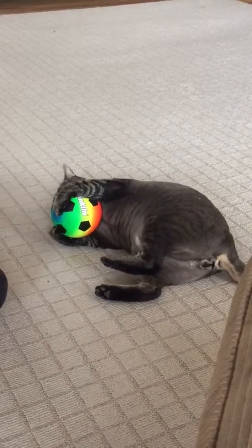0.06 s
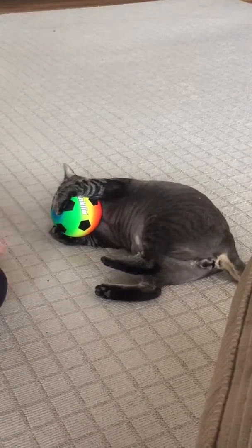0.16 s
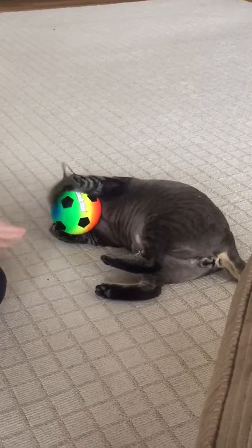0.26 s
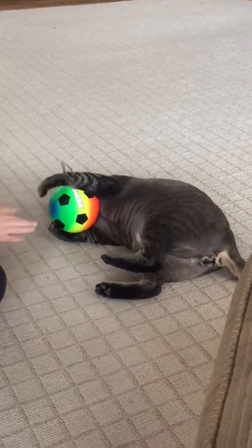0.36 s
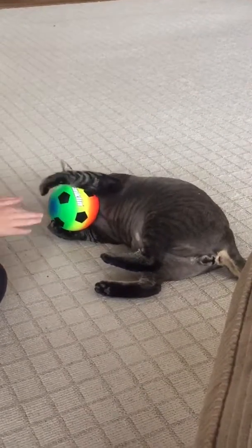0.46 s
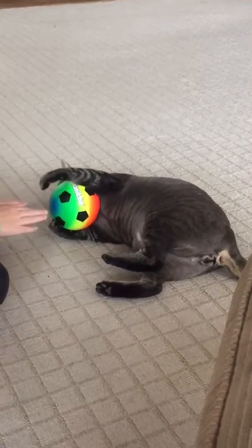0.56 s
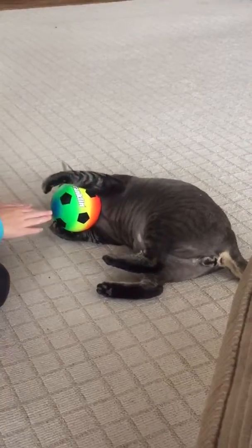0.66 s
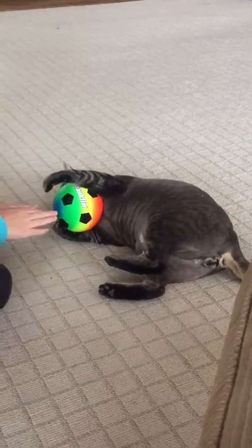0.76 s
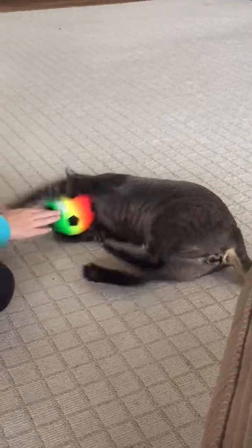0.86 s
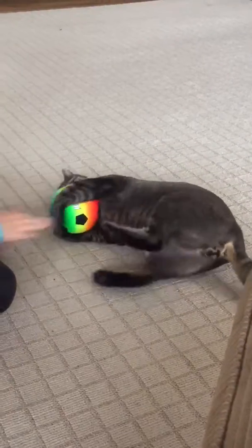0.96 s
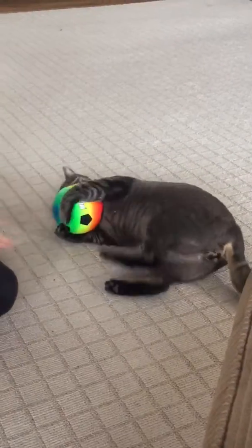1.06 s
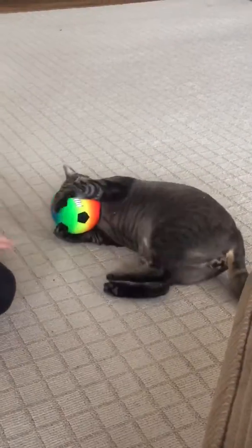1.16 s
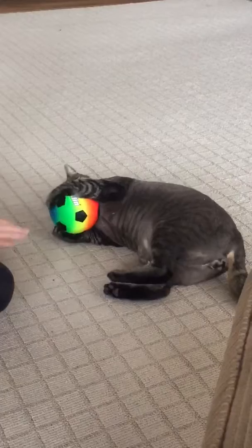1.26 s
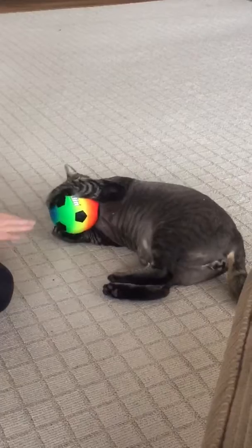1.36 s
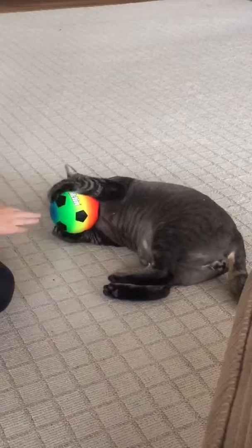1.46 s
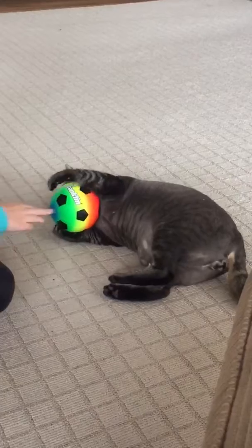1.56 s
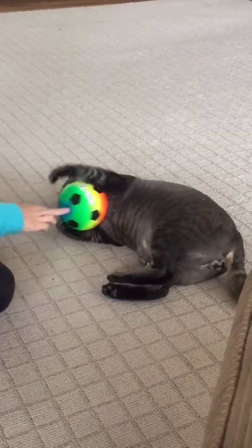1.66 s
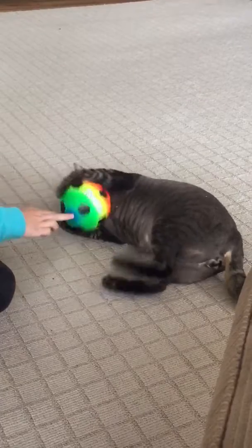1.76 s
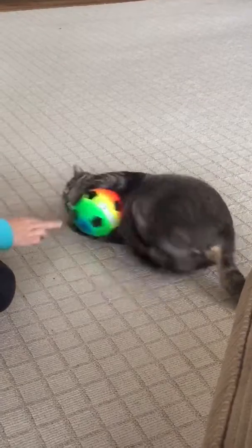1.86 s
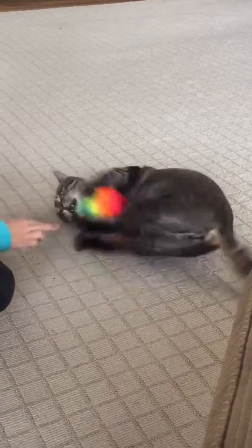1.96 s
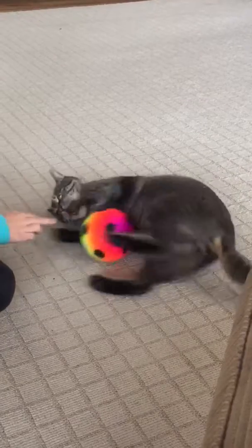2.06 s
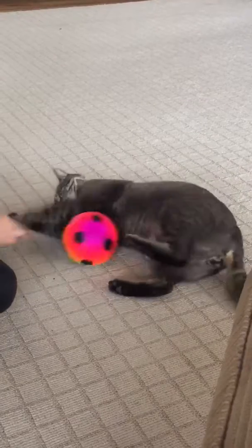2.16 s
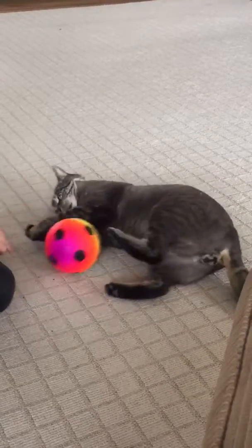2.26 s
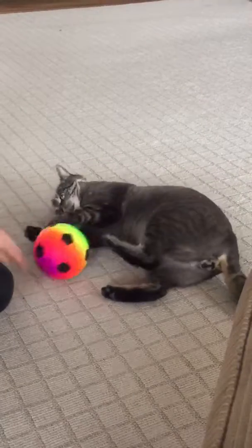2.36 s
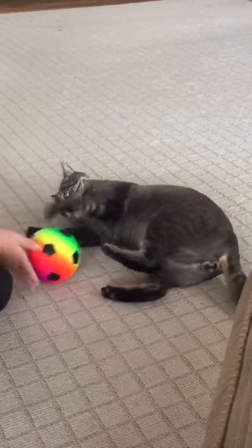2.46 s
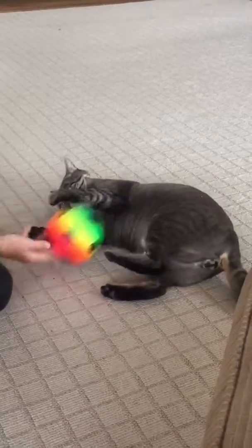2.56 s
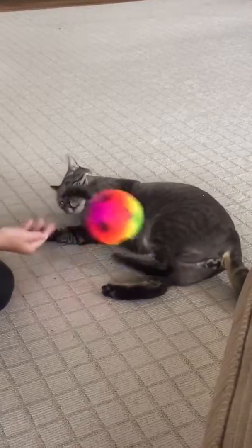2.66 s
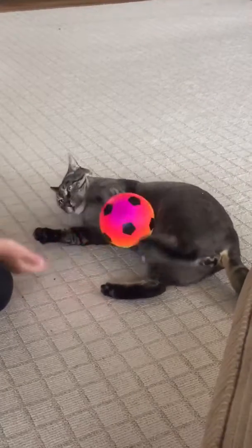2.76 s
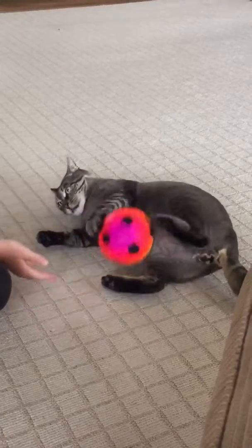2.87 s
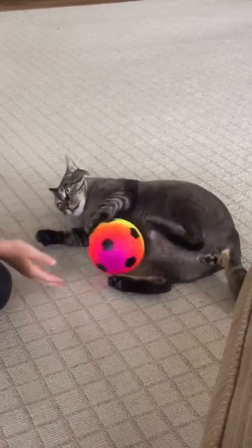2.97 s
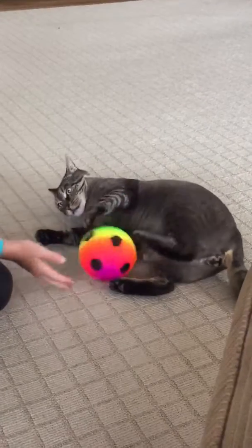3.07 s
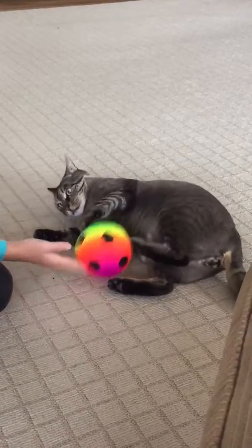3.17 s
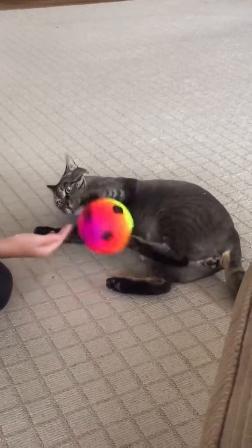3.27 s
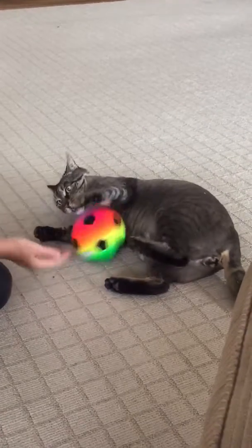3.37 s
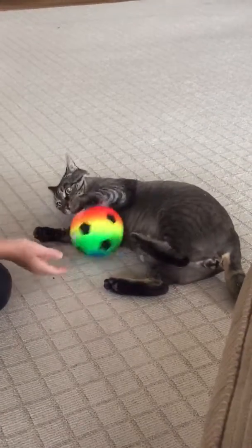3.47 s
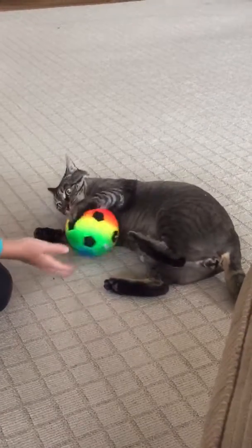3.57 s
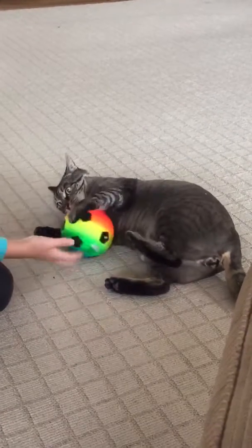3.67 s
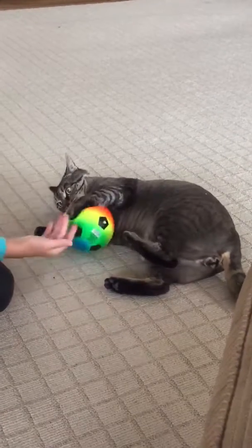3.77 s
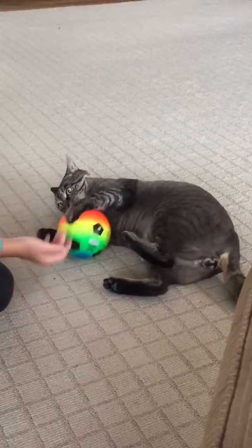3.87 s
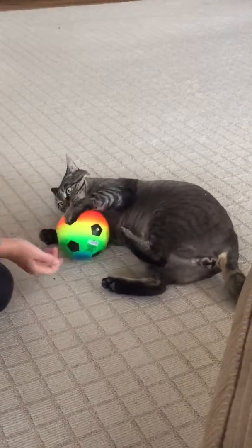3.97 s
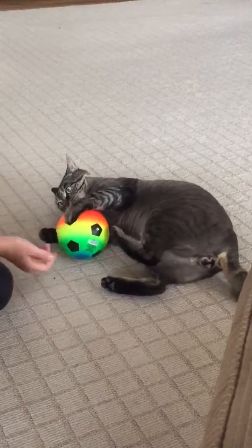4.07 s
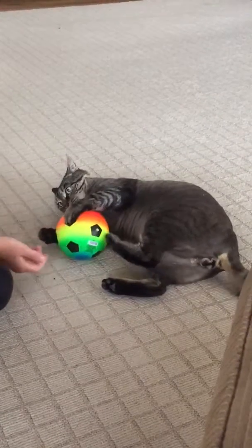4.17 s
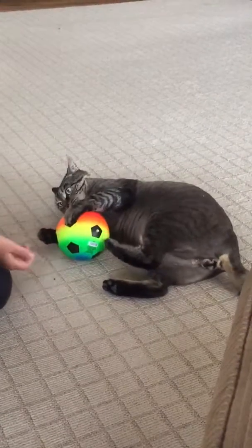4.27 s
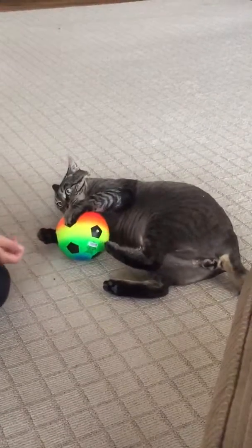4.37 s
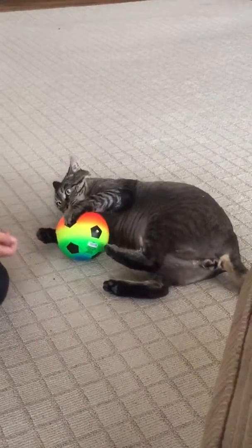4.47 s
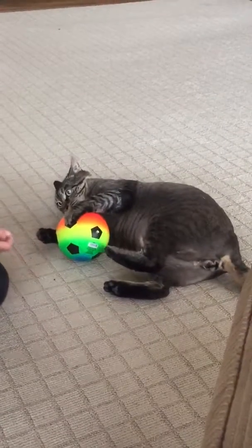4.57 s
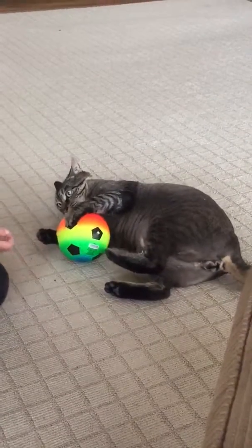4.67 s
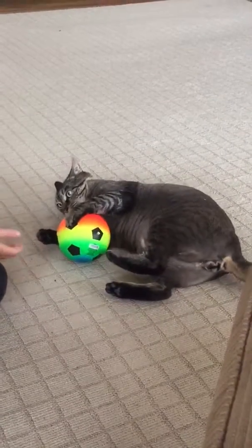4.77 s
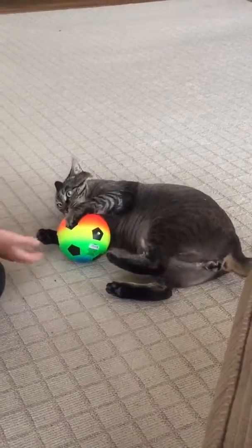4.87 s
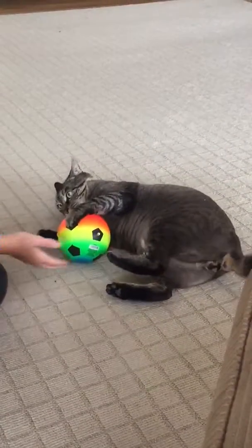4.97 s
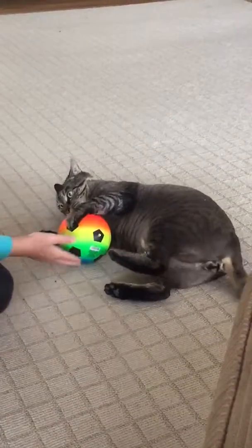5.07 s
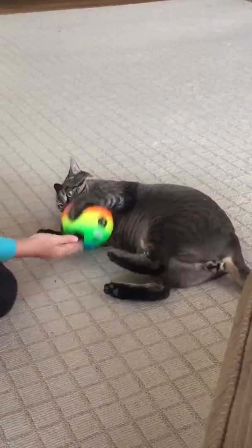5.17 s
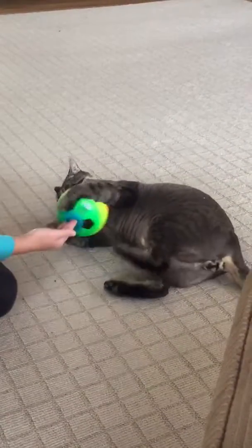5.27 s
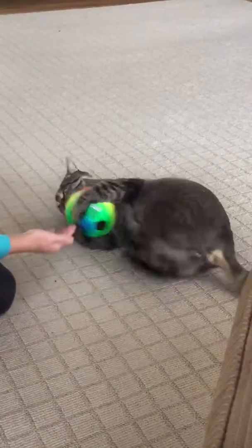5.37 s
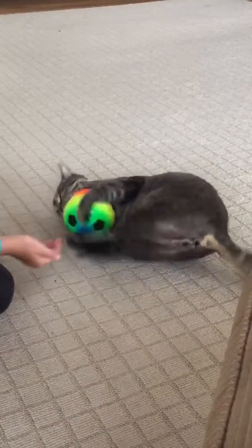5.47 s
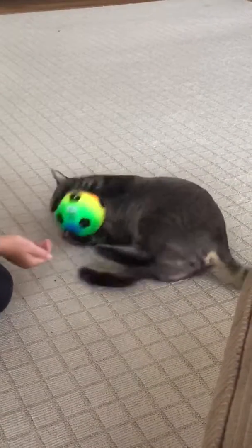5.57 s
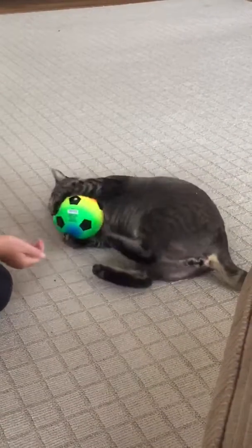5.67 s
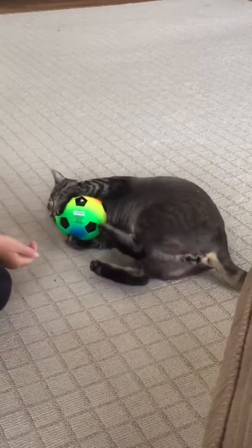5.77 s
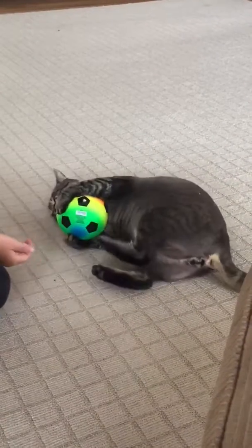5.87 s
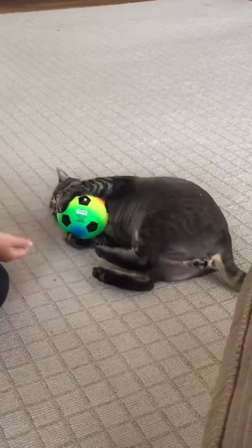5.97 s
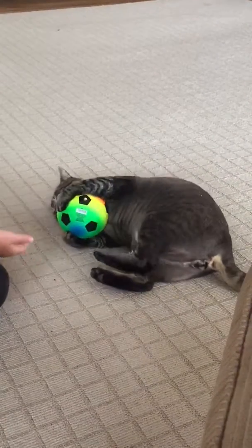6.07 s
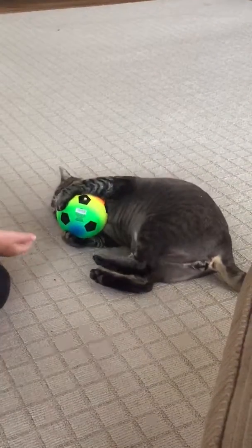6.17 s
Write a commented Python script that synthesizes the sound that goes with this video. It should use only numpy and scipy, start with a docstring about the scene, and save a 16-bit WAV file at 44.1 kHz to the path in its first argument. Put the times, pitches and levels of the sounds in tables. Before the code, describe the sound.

A cat lying on carpet starts with a quiet fluttering growl that tightens upward into a raspy snarl. A louder snarl follows with hiss, then rapid hollow paw thumps on a plastic ball. After a brief bark-like snarl it launches a long wavering yowl, falls silent, and ends with another snarl and thumps. Live living-room echo, soft rumble and faint hum; a microphone a short distance away.

```python
"""A cat hugging a soft plastic ball on a carpet warns off a hand: growl, short snarls, one long yowl.
Its voice is glottal pulses and turbulence through resonances that move with the jaw.
Thumps on the ball and a knock on the floor are decaying sines; fur, claws and air past the teeth
are shaped noise. A living room adds echoes, rumble, hum and hiss."""
import sys
import numpy as np
from scipy import signal
from scipy.fft import rfft, irfft, next_fast_len
from scipy.io import wavfile
from scipy.ndimage import uniform_filter1d

SR = 44100
rng = np.random.default_rng(int(sys.argv[2]) if len(sys.argv) > 2 else 0)


def dump(signal):
    """Clip the signal to [-1, 1] and save it as 16-bit WAV at the path in sys.argv[1]."""
    limited = np.clip(np.atleast_2d(signal).T, -1, 1)
    pcm = np.round(limited * 32767).astype(np.int16)
    wavfile.write(sys.argv[1], SR, pcm)


N = 274302
TIME = np.arange(N) / SR
FREQS = np.fft.rfftfreq(N, 1 / SR) + 1e-3   # offset keeps log(0) away


def from_db(db):
    """Decibels to amplitude gain."""
    return 10 ** (np.asarray(db) / 20)


def rms_one(x):
    """Scale to unit power."""
    return x / np.sqrt(np.mean(x ** 2) + 1e-20)


def in_time(rows):
    """Columns of a (time, ...) table, interpolated at every sample."""
    time_s, *columns = np.transpose(rows)
    return [np.interp(TIME, time_s, column) for column in columns]


def at_hz(points, hz):
    """Read a (frequency, value) table on a log-frequency axis."""
    table_hz, value = np.transpose(points)
    return np.interp(np.log(hz), np.log(table_hz), value)


def shaped(x, gain):
    """Zero-phase filter by a gain given at each of FREQS."""
    size = next_fast_len(N + SR // 2)
    size_gain = np.interp(np.fft.rfftfreq(size, 1 / SR), FREQS, gain)
    return irfft(rfft(x, size) * size_gain, size)[:N]


def band(x, edges_hz, order=4):
    """Butterworth band-pass."""
    sos = signal.butter(order, edges_hz, "band", fs=SR, output="sos")
    return signal.sosfilt(sos, x + 1e-18)


def noise(spectrum):
    """Steady noise of a given spectrum, unit power."""
    return rms_one(shaped(rng.standard_normal(N), from_db(at_hz(spectrum, FREQS))))


def drift(rate_hz):
    """Random curve through rate_hz knots a second, unit power."""
    knots = rng.standard_normal(8192)
    return rms_one(np.interp(TIME * rate_hz, np.arange(len(knots)), knots))


def swell(center_s, spread_s):
    """Gaussian rise and fall in time."""
    return np.exp(-.5 * np.minimum(((TIME - center_s) / spread_s) ** 2, 100))


def resonance(freqs_hz, center_hz, width_hz):
    """Gain of one steep-sided resonance."""
    return 1 / (1 + 2 * ((freqs_hz - center_hz) / width_hz) ** 2) ** 2


def narrow_noise(center_hz, width_hz):
    """Turbulence in one resonance, unit power."""
    return rms_one(shaped(rng.standard_normal(N), resonance(FREQS, center_hz, width_hz)))


def sounding(start_s, end_s):
    """One while the voice is on, with soft edges."""
    return uniform_filter1d(((TIME >= start_s) & (TIME <= end_s)) * 1., size=600)


def folds(pitch_hz, rough, jitter, rasp, waver=.006, shimmer_db=2.5):
    """Glottal pulses: rough folds beat unevenly and let a puff of turbulence through on each cycle."""
    hz = pitch_hz * (1 + waver * drift(35) + jitter * rough * drift(260))
    cycles = np.cumsum(hz) / SR
    pulses = rms_one(np.diff(np.floor(cycles), prepend=0) - hz / SR)   # one per cycle, mean removed
    puffs = rng.standard_normal(N) * (1 + np.cos(2 * np.pi * cycles))
    return (pulses + rasp * rough * puffs) * from_db(shimmer_db * rough * drift(140))


def through_tract(source, opening, tract):
    """Resonances shift with the jaw and ring on after each pulse (minimum phase)."""
    freqs_hz, times_s, frames = signal.stft(source, SR, nperseg=1024)
    jaw = np.interp(times_s, TIME, opening)
    gain = 0
    for shut_hz, wide_hz, width_hz, db in tract:
        center_hz = shut_hz + jaw * (wide_hz - shut_hz)
        gain = gain + from_db(db) * resonance(freqs_hz[:, None], center_hz, width_hz)
    cepstrum = irfft(np.log(gain + 1e-5), axis=0)
    phase = 2 * rfft(cepstrum[:512], 1024, axis=0).imag   # causal half gives minimum phase
    return signal.istft(frames * gain * np.exp(1j * phase), SR, nperseg=1024)[1][:N]


def call(source, jaw, tract, levels_db):
    """Fold sound through the tract; throat, mouth and teeth bands each follow their own level."""
    voice = through_tract(source, jaw, tract)
    # (band edges [Hz], core edges for levelling [Hz]): throat, mouth, teeth
    registers = [((70, 950), (600, 950)), ((950, 3300), (1000, 3000)), ((3300, 10000), (3500, 7000))]
    out = np.zeros(N)
    for level_db, ((low_hz, high_hz), core_hz) in zip(levels_db, registers):
        power = uniform_filter1d(band(voice, core_hz, order=3) ** 2, size=1300)
        share = 1 / (1 + (low_hz / FREQS) ** 12) / (1 + (FREQS / high_hz) ** 12)
        out += shaped(voice, share) / np.sqrt(np.abs(power) + 1e-12) * from_db(level_db)
    return out


def background(hum_hz=117.2, hum_db=-62, hum_waver_db=3.5, rumble_db=-54.5, hiss_db=-70.5):
    """Ventilation rumble and faint hiss as shaped noise, plus a sine hum of wavering level."""
    # noise spectra: (frequency [Hz], relative density [dB])
    rumble_spectrum = [(20, -41.5), (40, -13), (55, -2.5), (67, 5.5), (82, -3), (105, 2.5), (145, -4.5),
                       (200, -6.5), (300, -17), (400, -17), (550, -50.5)]
    hiss_spectrum = [(240, -21.5), (400, -7.5), (432, -12.5), (466, 1.5), (552, -7.5), (684, -8.5),
                     (738, -12.5), (958, -14.5), (1360, -16), (2980, -20.5), (4930, -24.5), (12400, -31.5),
                     (15600, -37.5)]
    hum = np.sqrt(2) * np.sin(2 * np.pi * hum_hz * TIME) * from_db(hum_db + hum_waver_db * drift(2.6))
    return from_db(rumble_db) * noise(rumble_spectrum) + from_db(hiss_db) * noise(hiss_spectrum) + hum


def rubbing(grain_db=2.0, relative_width=0.51):
    """Friction noise: fur and paws brush the carpet, claws scuff the plastic in narrower bands."""
    # carpet strokes: (time [s], level [dB], Gaussian spread [s])
    brush_strokes = [(0.464, -77.5, 0.051), (1.194, -72.5, 0.048), (1.993, -56.5, 0.015),
                     (2.027, -64.5, 0.056), (2.362, -76, 0.13), (3.25, -73.5, 0.024), (4.388, -79, 0.17),
                     (5.537, -60.5, 0.015), (5.555, -60.5, 0.0036)]
    # fur noise spectrum: (frequency [Hz], relative density [dB])
    brush_spectrum = [(200, -70), (1000, 1), (3000, 5.5), (6000, 1.5), (10000, -8), (13000, -5),
                      (16000, -10)]
    # claw scuffs: (time [s], level [dB], Gaussian spread [s], centre [Hz])
    claw_scuffs = [(1.871, -62, 0.00062, 3020), (2.353, -63, 0.011, 2220), (2.64, -71.5, 0.014, 2170),
                   (5.221, -68.5, 0.0095, 1830)]
    strokes = sum(from_db(db) * swell(s, spread_s) for s, db, spread_s in brush_strokes)
    out = noise(brush_spectrum) * strokes * from_db(grain_db * drift(300))
    for s, db, spread_s, hz in claw_scuffs:
        out += from_db(db) * swell(s, spread_s) * narrow_noise(hz, hz * relative_width)
    return out


def ball_and_floor(contact_s=0.0012, overtone=1.31, overtone_db=-7, floor_hz=85, floor_db=-19,
                   floor_decay_s=0.041):
    """Paw blows ring the held ball, the floor thudding under them; the low 161 Hz one knocks the floor."""
    # knocks: (time [s], level [dB], pitch [Hz])
    knocks = [(2.002, -23, 432), (2.04, -34.5, 390), (2.046, -36.5, 474), (2.062, -36, 413),
              (2.095, -23, 420), (2.107, -41, 423), (2.631, -46, 465), (2.736, -52, 490), (2.868, -45, 434),
              (3.263, -43, 430), (3.277, -42, 426), (3.512, -41.5, 504), (4.458, -48.5, 440),
              (5.211, -41.5, 161), (5.524, -30, 329), (5.555, -24.5, 363), (5.587, -35.5, 369),
              (5.6, -37, 411)]
    # damping, stronger for a harder knock: (knock level [dB], T60 [s])
    damping = [(-32.5, 0.068), (-25, 0.025)]
    out, t = np.zeros(N), TIME[:SR // 3]
    thud = from_db(floor_db) * np.sin(2 * np.pi * floor_hz * t) * np.exp(-t / floor_decay_s)
    onset = 1 - np.exp(-t / contact_s)
    for s, db, hz in knocks:
        t60_s = np.interp(db, *np.transpose(damping))
        ring = np.sin(2 * np.pi * hz * t) + from_db(overtone_db) * np.sin(2 * np.pi * hz * overtone * t)
        at = round(s * SR)
        out[at:at + len(t)] += from_db(db) * onset * (ring * from_db(-60 * t / t60_s) + thud)
    return out


def whistle(spread_s=0.014, width_hz=1100):
    """Air whistles past the teeth: brief swells of narrow-band turbulence."""
    # whistles: (time [s], level [dB], centre [Hz])
    whistles = [(1.988, -63, 13400), (2.965, -78, 9250)]
    return sum(from_db(db) * swell(s, spread_s) * narrow_noise(hz, width_hz) for s, db, hz in whistles)


def growl(flutter_db=2.0, opening=.22, mouth_db=-14.5):
    """A low, fluttering rattle behind a nearly shut jaw; it turns tonal as the folds tighten."""
    # growl course: (time [s], pitch [Hz], throat level [dB])
    course = [(0, 111.1, -71), (0.352, 120.4, -70.5), (0.479, 145.4, -63.5), (.68, 183, -62),
              (0.889, 178.7, -61.5), (.935, 177.3, -57.5), (.96, 176, -73)]
    # tract resonances: (centre, jaw shut [Hz], centre, jaw wide [Hz], width [Hz], relative gain [dB])
    tract = [(114, 180, 59, 14.5), (205.7, 390, 68, 3.5), (364, 386, 81, 8.5), (710, 690, 185, -2),
             (1140, 1240, 410, -22.5)]
    # slack folds rattle: (pitch [Hz], roughness [0-1])
    roughness = [(115, 0.72), (182, 0.3)]
    pitch_hz, level_db = in_time(course)
    source = folds(pitch_hz, at_hz(roughness, pitch_hz), jitter=0.121, rasp=0.63, waver=0.0202)
    voice = call(source, np.full(N, opening), tract, [level_db, level_db + mouth_db])
    return voice * from_db(flutter_db * drift(21.1)) * sounding(course[0][0], course[-1][0])


def yowl(waver=.008, strain_rough=0.47):
    """One long call: brighter and harsher with a wide jaw, clean as it closes, ragged as pitch sinks."""
    # yowl course: (time [s], pitch [Hz], throat level [dB], jaw opening [0-1])
    course = [(3.03, 281, -69.5, 0.14), (3.271, 322, -61, 0.26), (3.349, 346.2, -51, 0.32),
              (3.421, 382, -48.5, .64), (3.5, 414, -54.5, 0.97), (3.711, 408.4, -54, 0.65),
              (3.861, 392.2, -55.5, .4), (3.949, 389.4, -52, 0.27), (4.042, 379, -51, 0.32),
              (4.191, 367.1, -47.5, 0.02), (4.339, 298.2, -62, 0.15), (4.482, 238, -63, 0.02)]
    # tract resonances: (centre, jaw shut [Hz], centre, jaw wide [Hz], width [Hz], relative gain [dB])
    tract = [(304, 285, 203, 1.5), (692, 750, 192, 2.5), (923, 1292, 104, -2.5), (1267, 1540, 390, -9),
             (1624, 2420, 315, -11.5), (2070, 2740, 330, -23.5), (5100, 5530, 650, -15)]
    # roughness before strain, clearing as the folds tighten: (pitch [Hz], roughness [0-1])
    roughness = [(250, .4), (380, .08)]
    pitch_hz, throat_db, jaw = in_time(course)
    rough = at_hz(roughness, pitch_hz) + strain_rough * jaw ** 2
    source = folds(pitch_hz, rough, jitter=.095, rasp=.7, waver=waver)
    # an open jaw lets the treble out
    mouth_db = throat_db - 12.5 + 22.5 * jaw
    teeth_db = throat_db - 42.5 + 27.5 * jaw
    voice = call(source, jaw, tract, [throat_db, mouth_db, teeth_db])
    return voice * sounding(course[0][0], course[-1][0])


def snarls(jaw_start=0.033, muffle_db=11, lips_part_s=0.011, hiss_sag=3, fall_curve=0.56,
           release_db_per_s=303):
    """Shut lips muffle the treble, then part; pitch arches, the jaw drops, level sags, hiss peaks last."""
    # snarls: (start [s], rise [s], fall [s], sag [dB], top pitch [Hz], pitch drop at both ends [share],
    # roughness [0-1], throat level [dB], mouth level [dB], hiss level [dB], hiss lag [s],
    # lips part after [s], jaw opening [0-1], time to open [s], chest share [0-1])
    bursts = [(.928, 0.043, .16, 14.5, 403.2, .33, 0.43, -45.5, -43.5, -70, 0.072, 0.038, 0.61, 0.19, 0.26),
              (1.86, 0.097, .16, 17, 360.9, .18, .7, -43, -43.5, -51.5, 0.041, 0.047, 0.78, 0.15, 0.22),
              (2.135, .038, 0.038, 19, 371, .12, .4, -53, -59.5, -65, 0.0024, .01, 0.8, .02, 0.1),
              (2.905, 0.046, .075, 17.5, 308.4, .2, .7, -46.5, -46.5, -60, 0.024, 0.016, 0.52, 0.047, 1),
              (5.482, .042, .12, 22, 346, .07, .3, -44.5, -44.5, -54, 0.0046, 0.0055, 0.85, 0.054, 0.5)]
    # tract and chest resonances: (centre, jaw shut [Hz], centre, jaw wide [Hz], width [Hz],
    # relative gain [dB])
    tract = [(266, 220, 247, -1), (658, 719, 60, 8), (1034, 790, 630, -7.5), (1230, 1440, 185, -8),
             (1384, 1880, 200, -3.5), (1854, 2200, 260, -6), (1880, 2840, 340, -10),
             (3150, 3370, 1400, -28.5), (3850, 4840, 480, -12), (4470, 6020, 750, -11),
             (6650, 6100, 1700, -36)]
    chest_tract = [(266.8, 196, 40, 14)]
    # level climb to the peak: throat, mouth, hiss [dB]
    climbs_db = (15, 23, 27.5)
    rows = np.array(bursts)
    current = np.maximum(np.searchsorted(rows[:, 0], TIME) - 1, 0)   # latest snarl at each sample
    (start_s, rise_s, fall_s, sag_db, top_hz, arch, rough, throat_db, mouth_db, hiss_db, lag_s,
     parting_s, wide, opening_s, chest) = rows[current].T
    age_s = TIME - start_s
    progress = np.clip(age_s / (rise_s + fall_s), 0, 1)
    pitch_hz = top_hz * (1 - arch * np.cos(np.pi * progress) ** 2)
    jaw = jaw_start + (wide - jaw_start) * np.clip(age_s / opening_s, 0, 1)
    lips_db = muffle_db * np.clip((parting_s - age_s) / lips_part_s, 0, 1)

    tops_db = (throat_db, mouth_db - lips_db, hiss_db - lips_db)
    peaks_s = (rise_s, rise_s, rise_s + lag_s)
    sags_db = (sag_db, sag_db, hiss_sag * sag_db)
    levels_db = []
    for top_db, peak_s, climb_db, down_db in zip(tops_db, peaks_s, climbs_db, sags_db):
        climb = climb_db * np.maximum(1 - age_s / peak_s, 0)
        # exponent below 1: a quick drop, then a lingering rasp
        sag = down_db * (np.maximum(age_s - peak_s, 0) / fall_s) ** fall_curve
        levels_db.append(top_db - climb - sag)

    source = folds(pitch_hz, rough, jitter=.13, rasp=1.4)
    boom = chest * from_db(levels_db[0]) * rms_one(through_tract(source, jaw, chest_tract))
    onset = np.clip(age_s / lips_part_s, 0, 1)
    release = from_db(-release_db_per_s * np.maximum(age_s - rise_s - fall_s, 0))
    return (call(source, jaw, tract, levels_db) + boom) * onset * release


def room(x, early_db=-4, early_decay_s=0.016, tail_db=-3.0):
    """Furniture scatters short waves as sparse early echoes; a diffuse tail dies soonest in the treble."""
    # reverberation time: (frequency [Hz], T60 [s])
    reverb_t60 = [(100, 0.47), (500, 0.68), (1600, 0.79), (2500, 0.73), (5000, 0.67), (14000, 0.18)]
    edges_hz = np.geomspace(60, 16000, 9)
    t, white = TIME[:SR], rng.standard_normal(SR)
    tail = np.zeros(SR)
    for low_hz, high_hz in zip(edges_hz, edges_hz[1:]):
        t60_s = at_hz(reverb_t60, np.sqrt(low_hz * high_hz))
        tail += band(white, (low_hz, high_hz), order=2) * from_db(-60 * t / t60_s)
    # scaled to about unit energy by the decay at 1 kHz
    tail = tail * (t > .008) * np.sqrt(2 * np.log(1000) / (SR * at_hz(reverb_t60, 1000)))
    taps = rng.standard_normal(SR) * (rng.random(SR) < 900 / SR)   # about 900 echoes a second
    early = taps * (t > .002) * np.exp(-t / early_decay_s)
    early = band(early / np.linalg.norm(early), (800, 16000), order=2)
    return signal.fftconvolve(x, from_db(early_db) * early + from_db(tail_db) * tail)[:N]


def scene():
    """Cat, ball and floor sound in the room, over rubbing and the quiet background."""
    direct = growl() + yowl() + snarls() + whistle() + ball_and_floor()
    return (direct + room(direct) + rubbing() + background())[None]


def record(dry, cutoff_hz=15700):
    """Steep elliptic low-pass."""
    return signal.sosfilt(signal.ellip(10, .1, 70, cutoff_hz, fs=SR, output="sos"), dry)


dry = scene()
out = record(dry)
dump(out)
```